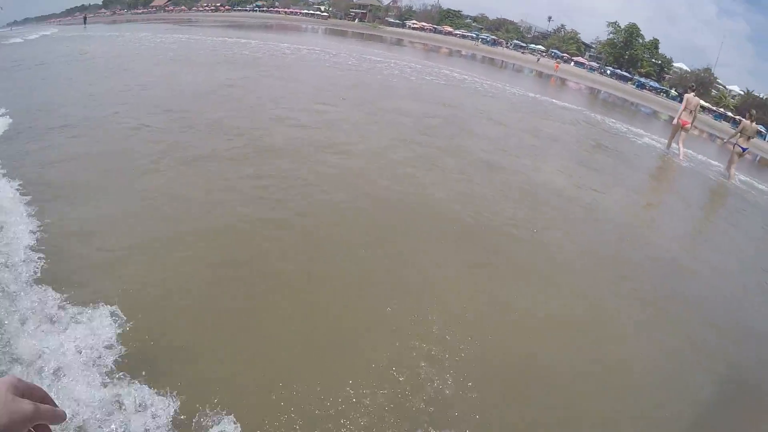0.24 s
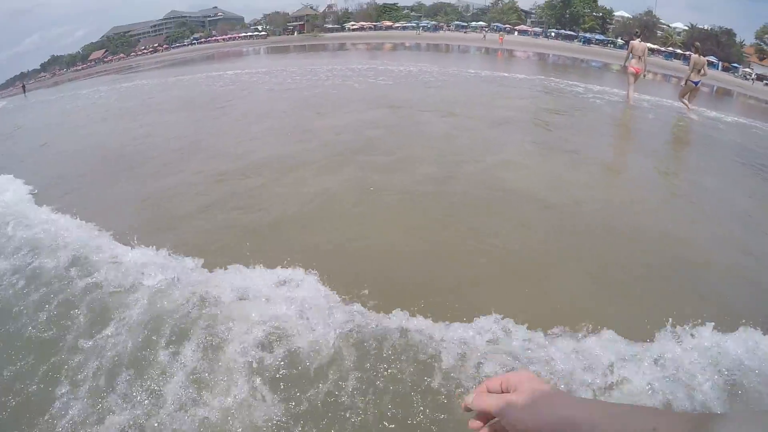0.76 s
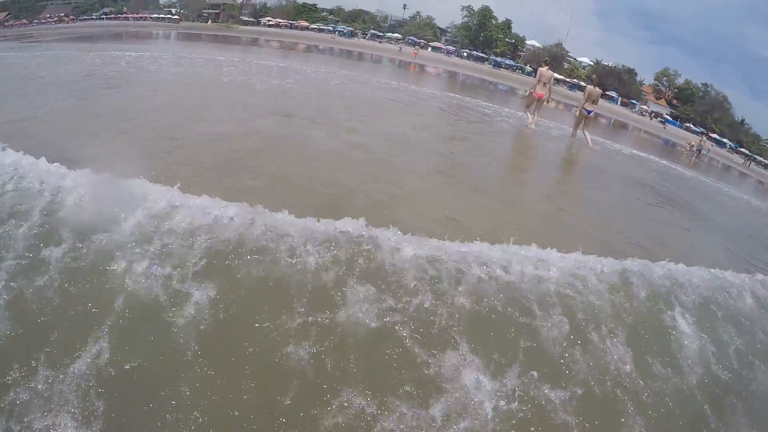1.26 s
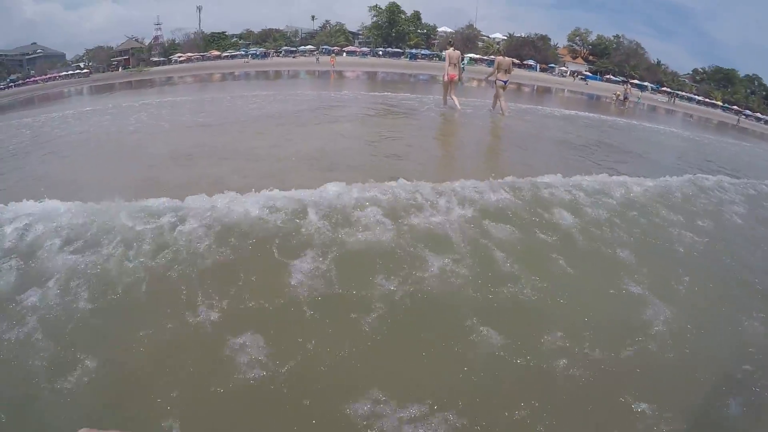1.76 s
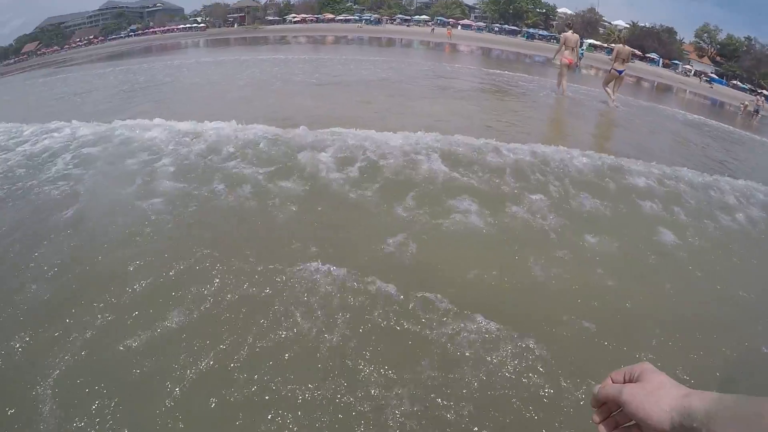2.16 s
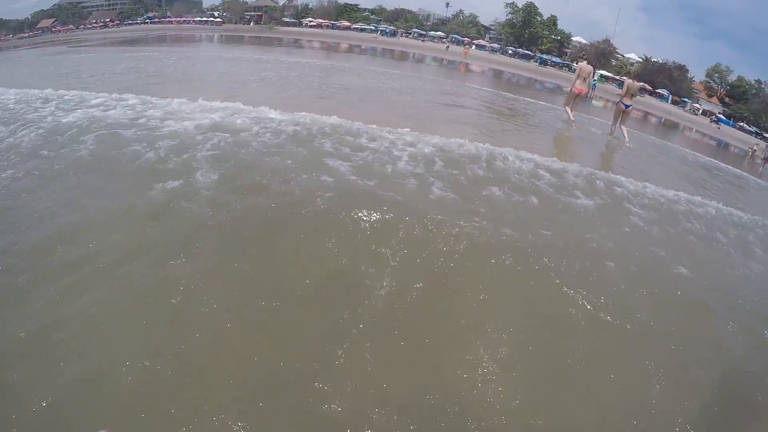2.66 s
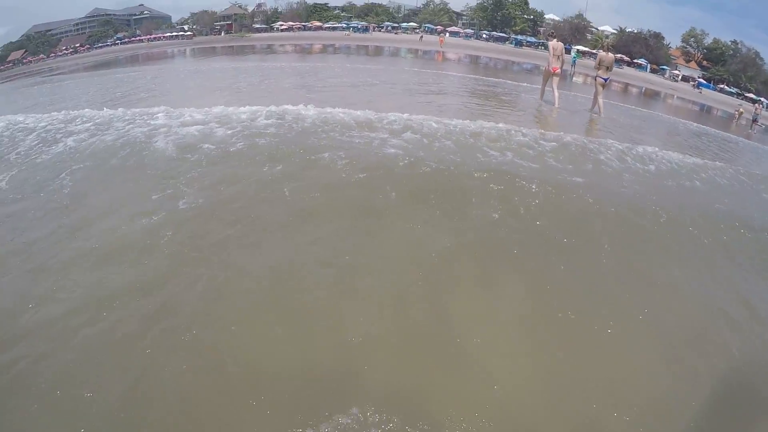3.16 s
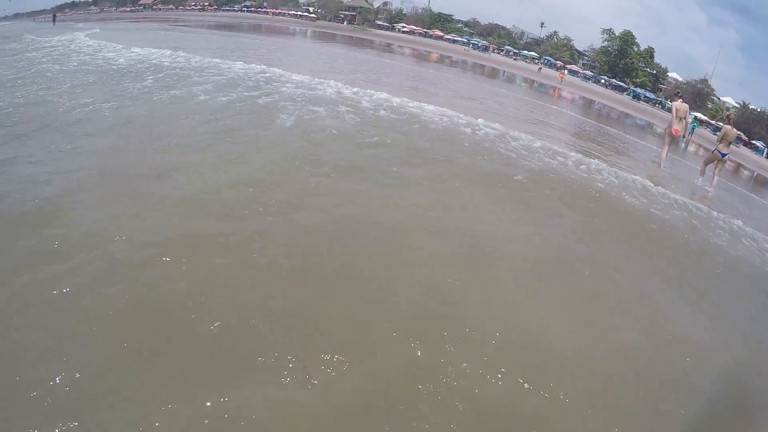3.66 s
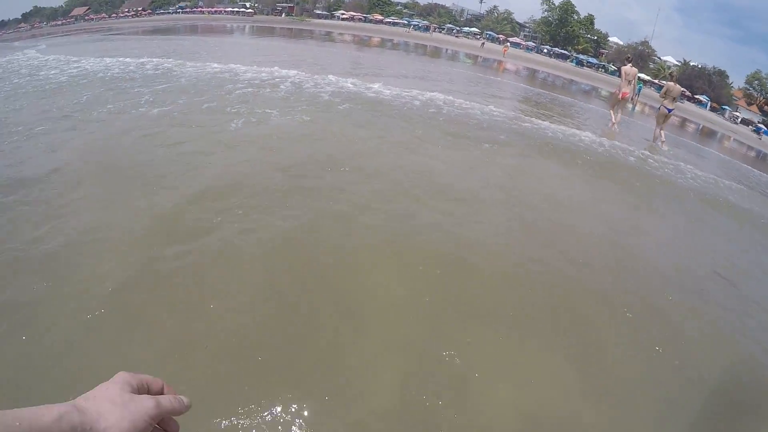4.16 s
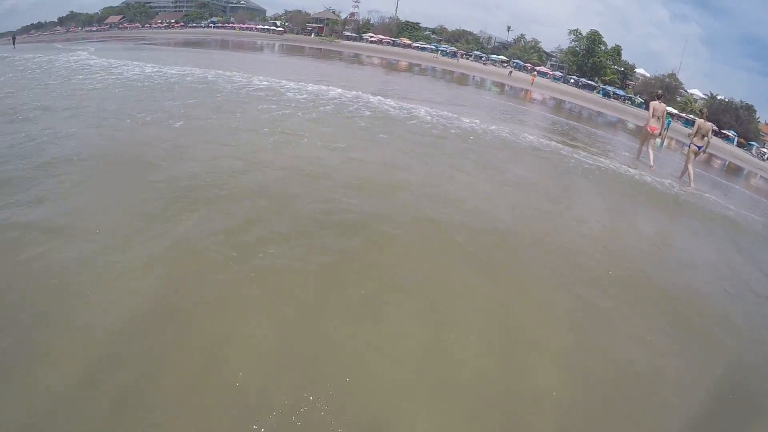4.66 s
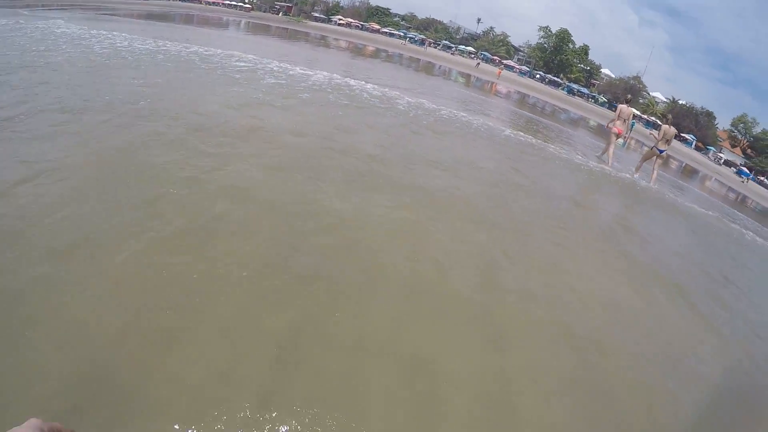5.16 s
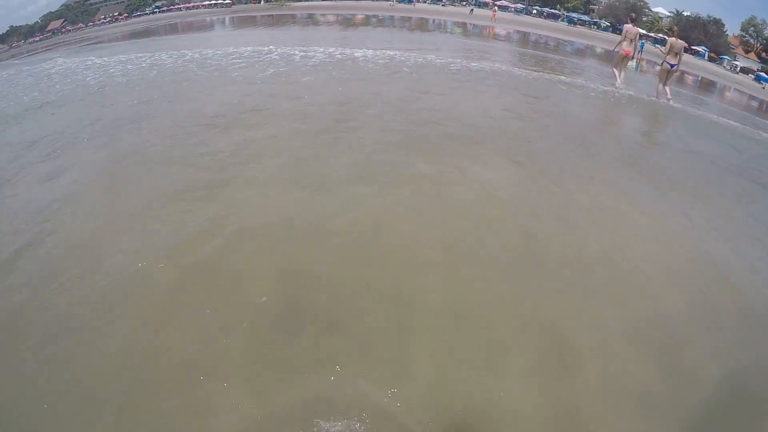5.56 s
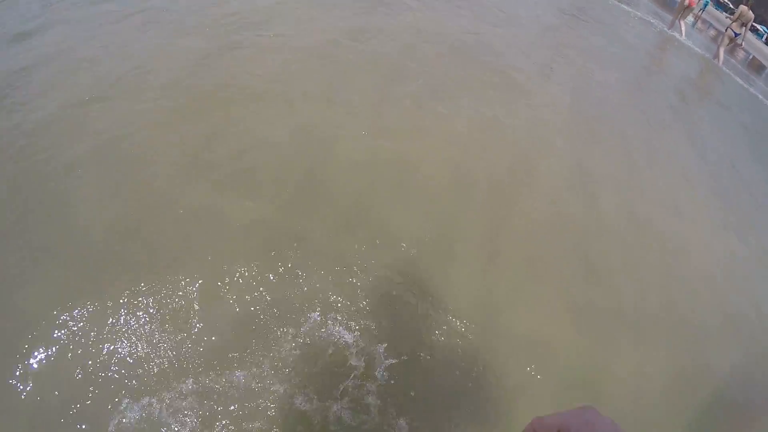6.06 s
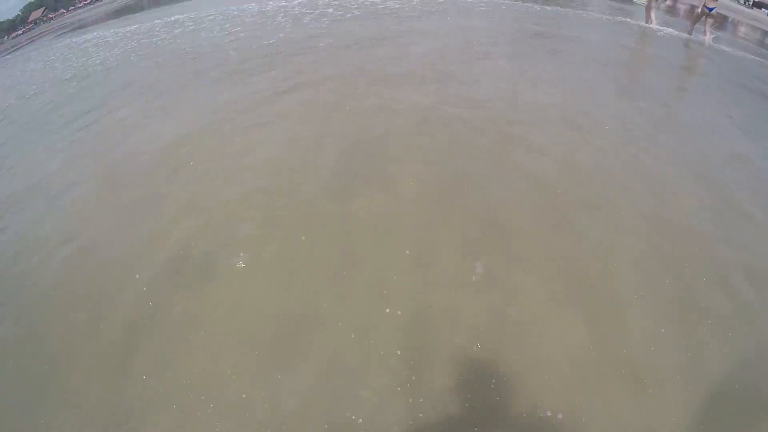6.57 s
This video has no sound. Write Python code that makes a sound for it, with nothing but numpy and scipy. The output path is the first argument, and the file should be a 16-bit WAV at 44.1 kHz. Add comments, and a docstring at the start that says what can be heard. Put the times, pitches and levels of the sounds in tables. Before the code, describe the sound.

Steady mid-toned surf rush with gurgling, fizzing bubbles, heard close and slightly boxy. An early splash and a breaking ripple come first, then uneven wading swishes, spray patter, small plops and occasional ticks of drops on the casing. Deep fluttering wind bumps recur with the strides. The last half second brings loud ragged buffeting and a burst of hard, dry water cracks.

```python
"""Wading through shallow surf and breaking into a run, heard from a body-worn camera in a waterproof case.
Over steady surf and a faint breeze a small wave slaps and foams past in the first second: noise and bubbles.
The legs churn up foam, spray and single plops; strides push wind over the case, as swelling turbulent noise.
Stray drops tick on the case, as short ringing noise bursts.
At the end the gusts crowd together and grow rough, and thrown water smacks the case with hard cracks."""
import sys
import numpy as np
from scipy import signal
from scipy.fft import rfft, irfft, next_fast_len
from scipy.io import wavfile
from scipy.ndimage import uniform_filter1d

SR = 44100
rng = np.random.default_rng(int(sys.argv[2]) if len(sys.argv) > 2 else 0)


def master(y):
    """Save y as 16-bit WAV."""
    cut = np.clip(np.atleast_2d(y).T, -1, 1)
    pcm = np.round(cut * 32767)  # scale
    wavfile.write(sys.argv[1], SR, pcm.astype(np.int16))


N = 300321
TIME = np.arange(N) / SR  # s

# A gust or two for each stride, crowding together in the run. Each row: centre in seconds,
# half length in seconds, then the levels in dB of its flutter, its slow swirl and its rough rush.
GUSTS = [(0.546, 0.057, -32, -15.5, -43.5), (1.196, 0.071, -36, -20, -47.5), (1.796, 0.031, -28, -19, -43),
         (1.861, 0.023, -18, -11.5, -48), (2.324, 0.039, -50, -23, -57), (2.434, 0.042, -42, -27, -50),
         (3.029, 0.038, -28, -25.5, -65), (3.688, 0.062, -33.5, -23, -45.5),
         (4.289, 0.026, -25.5, -21, -47), (4.356, 0.017, -34.5, -16.5, -60), (4.777, 0.06, -54, -25, -60),
         (5.451, 0.046, -37, -25.5, -54), (6.358, 0.093, -37, -19, -42), (6.467, 0.041, -22, -8.5, -31.5),
         (6.565, 0.028, -25, -18, -40), (6.677, 0.017, -14, -22, -38), (6.748, 0.036, -20, -8, -29.5)]


def undb(db):
    """Decibels to gain."""
    return 10 ** (np.asarray(db) / 20)


def unit(x):
    """Scale to rms 1."""
    return x / np.sqrt(np.mean(x ** 2))


def together(*strengths):
    """Joint strength of unrelated sounds: their powers add."""
    return np.sqrt(sum(strength ** 2 for strength in strengths))


def swells(times, halves, levels_db):
    """Strength over time of bell-shaped swells; a length or level may be shared by all."""
    rows = np.broadcast(times, halves, levels_db)
    power = sum(undb(db) ** 2 * np.exp(-((TIME - s) / half) ** 2) for s, half, db in rows)
    return np.sqrt(power)


def walk(rate):
    """Smooth random wander with spread near 1, taking rate new values a second."""
    steps = rng.standard_normal(4096)
    return 1.2 * np.interp(TIME * rate, np.arange(len(steps)), steps)


def add(out, s, sound):
    """Mix a short sound in at time s."""
    i = int(np.clip(s * SR, 0, N - 1))
    out[i:i + len(sound)] += sound[:N - i]


def colour(x, points):
    """Causal filter with the given (Hz, dB) outline, falling away steeply above its last point."""
    size = next_fast_len(N + SR // 2) * 2
    hz, db = np.transpose(points)
    freq = np.arange(size // 2 + 1) * SR / size + 1  # 1 Hz up, so the logarithm exists
    outline_db = np.interp(np.log(freq), np.log(hz), db)
    outline_db = outline_db - 20 * np.maximum(np.log2(freq / hz[-1]), 0)
    # folding the cepstrum onto positive times gives minimum phase
    cepstrum = irfft(np.log(undb(outline_db)))
    cepstrum[1:size // 2] *= 2
    cepstrum[size // 2 + 1:] = 0
    response = np.exp(rfft(cepstrum))
    return irfft(rfft(x, size) * response)[:N]


def split(x, hz, side):
    """The low or the high side of a sound."""
    return signal.sosfilt(signal.butter(3, hz, side, fs=SR, output="sos"), x)


def resonate(x, hz, width):
    """One resonance, gain 1 at its centre."""
    b, a = signal.iirpeak(hz, hz / min(width, SR / 4), fs=SR)
    return signal.lfilter(b, a, x)


def ring(x, resonances):
    """Lift or dip the sound at each (Hz, width, dB) resonance."""
    return x + sum((undb(db) - 1) * resonate(x, hz, width) for hz, width, db in resonances)


def bubble(hz, cycles, glide):
    """A trapped pocket of air rings out, rising in pitch as it nears the surface."""
    age = np.arange(int(cycles * SR / hz) + 2) * hz / (cycles * SR)  # 0 to 1 over the ring
    tone = np.sin(2 * np.pi * cycles * age * (1 + glide * age / 2))
    return tone * np.exp(-np.log(100) * age)


def bubbles(lo_hz, hi_hz, cycles, glide, spread_db, count):
    """A cloud of bubbles at random times and pitches: many faint ones, a few strong."""
    out = np.zeros(N)
    for when, pitch, size, ringing in rng.random((count, 4)):
        strength = undb(spread_db * min(-np.log(1 - size), 5))
        hz = lo_hz * (hi_hz / lo_hz) ** pitch
        add(out, when * N / SR, strength * bubble(hz, cycles * (.5 + ringing), glide))
    return unit(out)


def patter(rate, spread_db):
    """Random tiny impacts of uneven size, about rate of them a second."""
    sizes = undb(spread_db * np.minimum(rng.exponential(size=N), 4.5))
    hits = rng.random(N) < rate / SR
    return unit(hits * sizes * rng.choice([-1, 1], N))


def eddies(points, hold_s):
    """Turbulent pressure whose strength stays even over about hold_s."""
    x = unit(colour(rng.standard_normal(N), points))
    power = np.abs(signal.hilbert(x, next_fast_len(N))[:N]) ** 2 / 2
    hold = int(hold_s * SR)
    power = uniform_filter1d(uniform_filter1d(power, hold), hold)
    return x / np.sqrt(power + .03)  # the floor keeps lulls from being blown up


def water_levels():
    """Churning, foam and spray in dB: the open sea, one wave passing in its wide patch of foam, and splashes."""
    # The water's three voices, before the trims in wash() and scene().
    # Each: churning level in dB, foam level in dB, fine spray level in dB.
    open_sea_db = (-52, -49.5, -61.5)
    wave_crest_db = (-48, -43, -47.5)
    wave_foam_db = (-56, -45, -56)
    # Splashes of the legs, and at 0.533 s the slap of a small wave, before the same trims.
    # Each row: centre in seconds, half length in seconds, foam level in dB, fine spray level in dB.
    splashes = [(0.024, 0.11, -45.5, -46), (0.533, 0.034, -44, -48), (1.256, 0.13, -55, -52),
                (1.76, 0.19, -51, -53.5), (2.082, 0.063, -55, -56), (2.98, 0.078, -49.5, -59),
                (4.178, 0.13, -53, -58), (4.312, 0.047, -52.5, -57.5), (4.836, 0.12, -45.5, -54),
                (5.465, 0.1, -50.5, -60.5), (6.04, .1, -56, -54.5), (6.484, 0.018, -44.5, -56),
                (6.703, 0.13, -60, -54.5)]
    wave_passes_s, crest_half_s, foam_half_s = 0.54, 0.27, 1.39
    splash_churn_db = -7.5  # churning relative to the foam of a splash

    s, half, foam_db, spray_db = np.transpose(splashes)
    splashing = [swells(s, half, db) for db in (foam_db + splash_churn_db, foam_db, spray_db)]
    crest = [swells(wave_passes_s, crest_half_s, db) for db in wave_crest_db]
    patch = [swells(wave_passes_s, foam_half_s, db) for db in wave_foam_db]
    voices = zip(undb(open_sea_db), crest, patch, splashing)
    return [20 * np.log10(together(*parts)) for parts in voices]


def wash(churn_db, foam_db):
    """Broken water: big bubbles gurgle and small ones burst in the foam, over the rushing noise of the surf."""
    # Colour of the surf. Each row: frequency in Hz, filter gain in dB.
    surf_colour = [(150, 0.5), (300, -1), (520, -6), (900, -2), (1180, -3.5), (1450, 2.5), (2200, -0.5),
                   (2900, -5.5), (3150, -10), (4200, -9), (5500, -19), (8200, -27.5), (9500, -32),
                   (15000, -35)]
    gurgle = bubbles(lo_hz=410, hi_hz=1284, cycles=15.0, glide=0.28, spread_db=2.5, count=1400)
    fizz = bubbles(lo_hz=1242, hi_hz=6060, cycles=13.0, glide=0.06, spread_db=2.5, count=7000)

    rush = colour(rng.standard_normal(N), surf_colour)
    churn = unit(split(rush, 1080, "low")) + undb(-8.5) * gurgle

    bursting = rng.standard_normal(N) + 0.89 * patter(rate=2500, spread_db=3.0)
    foam = unit(split(colour(bursting, surf_colour), 990, "high"))
    foam = foam + undb(-4) * unit(colour(fizz, surf_colour))

    # both levels waver a little
    churn = unit(churn) * undb(churn_db + 3.0 + 0.59 * walk(16))
    return churn + unit(foam) * undb(foam_db + 0.47 * walk(25))


def spray(spray_db):
    """Flung drops patter back on the sea in little showers, among the tinkle of tiny bubbles."""
    # Colour of the fine spray. Each row: frequency in Hz, filter gain in dB.
    spray_colour = [(2000, -8.5), (3200, 5.5), (4200, -1), (5500, -1), (7200, -6), (8300, -8.5),
                    (9200, -11.5), (12000, -15), (15000, -16)]
    drops = patter(rate=900, spread_db=3.0) + undb(1) * rng.standard_normal(N)
    tinkle = bubbles(lo_hz=3090, hi_hz=14400, cycles=11, glide=0.14, spread_db=3.5, count=2600)
    shower = unit(colour(drops, spray_colour)) + undb(-4) * unit(colour(tinkle, spray_colour))
    return unit(shower) * undb(spray_db + 1.5 * walk(22.14))


def wind():
    """Each stride swings the case through the air: slow swirls, and a flutter that booms in its cavity."""
    # Soft puffs as the body swings between strides. Each row: centre in seconds, level in dB.
    swings = [(.05, -33.5), (.3, -33.5), (.85, -29), (1.64, -29.5), (2.02, -27.5), (2.82, -30),
              (3.23, -24.5), (4.0, -29.5), (4.48, -28.5), (4.92, -31), (5.152, -27), (5.61, -27.5),
              (5.93, -27), (6.2, -34.5)]
    # Colours of the slow swirl and of the booming flutter. Each row: frequency in Hz, filter gain in dB.
    swirl_colour = [(8, -1), (15, 0), (23, 14), (36, -6), (62, -9.5), (100, -21.5), (200, -46)]
    flutter_colour = [(40, -14.5), (62, 2), (86, -6.5), (108, 1.5), (130, -0.5), (160, -14.5), (200, -25.5),
                      (300, -30.5), (900, -41), (2000, -59)]
    breeze_swirl_db, breeze_flutter_db = -45, -55
    swing_half_s, swing_flutter_db = 0.049, -21.5  # flutter relative to the puff
    swirl_lag_s = 0.029  # the slow swirl trails its gust

    s, half, flutter_db, swirl_db, _ = np.transpose(GUSTS)
    swing_s, swing_db = np.transpose(swings)
    puffs = swells(swing_s, swing_half_s, swing_db)
    gust_swirl = swells(s + swirl_lag_s, half, swirl_db)
    swirl = together(gust_swirl, puffs, undb(breeze_swirl_db))
    gust_flutter = swells(s, half, flutter_db)
    flutter = together(gust_flutter, undb(swing_flutter_db) * puffs, undb(breeze_flutter_db))
    # the flutter comes in lumps as single eddies pass
    lumps = unit(undb(2.4 * walk(55)))
    slow = swirl * eddies(swirl_colour, hold_s=0.083)
    return slow + flutter * lumps * eddies(flutter_colour, hold_s=0.06)


def hiss():
    """The faint even hiss of the microphone."""
    return undb(-70.5) * rng.standard_normal(N)


def crack(db, hz, width, t60):
    """A brief impact that rings one resonance of the case; db is its peak."""
    age = TIME[:SR // 10]
    contact = rng.standard_normal(len(age)) * np.exp(-np.log(1000) * age / t60)
    contact[0] += 6  # an extra kick at first touch
    knock = split(resonate(contact, hz, width), min(2 * hz, SR / 3), "low")
    return undb(db) * knock / np.abs(knock).max()


def smacks():
    """Stray drops tick on the case; thrown water hits it with short hard cracks."""
    # Single drops on the case. Each row: start in seconds, peak level in dB, centre in Hz.
    drops = [(0.0581, -25.5, 4940), (.622, -37, 4460), (1.019, -47, 8000), (1.257, -45, 7000),
             (2.076, -49, 11000), (4.253, -34, 5500), (4.314, -38.5, 5970), (4.9077, -33, 4500),
             (6.6905, -49, 5500)]
    # Thrown water striking the case. Each row: start in seconds, peak level in dB, centre in Hz,
    # width in Hz, 60 dB decay time of the contact noise in seconds.
    strikes = [(6.474, -31, 1910, 1400, 0.087), (6.492, -25.5, 1010, 400, 0.039),
               (6.7392, -11.5, 1400, 905, 0.0084), (6.7385, -21, 4000, 4000, 0.008),
               (6.7443, -24, 4000, 900, 0.0021), (6.7576, -15, 4170, 2600, 0.0096),
               (6.7574, -12, 2860, 340, 0.02), (6.77, -20.5, 2570, 900, 0.012)]
    out = np.zeros(N)
    for s, db, hz in drops:
        add(out, s, crack(db, hz, width=1800, t60=0.025))
    for s, db, hz, width, t60 in strikes:
        add(out, s, crack(db, hz, width, t60))
    return out


def gusts():
    """At its crest a hard gust breaks up into a ragged, sputtering rush that rings the panels of the case."""
    # Colour of the torn air. Each row: frequency in Hz, filter gain in dB.
    torn_colour = [(120, 2), (200, 6), (260, 2.5), (330, 0), (500, -2.5), (800, -2.5), (1250, -14.5),
                   (1900, -5.5), (3000, -22.5), (4200, -20), (7000, -41), (15000, -43)]
    # Low resonances of the case's panels. Each row: centre in Hz, width in Hz, boost in dB.
    panels = [(246, 22, 7), (417, 39, 0.5), (526, 38, 7), (1006, 135, 8.5)]
    s, half, _, _, rush_db = np.transpose(GUSTS)
    sputter = rng.standard_normal(N) + 0.31 * patter(rate=900, spread_db=3)
    turbulence = unit(ring(colour(sputter, torn_colour), panels))
    ragged = undb(3.5 * walk(110))
    return swells(s, 0.77 * half, rush_db) * turbulence * ragged  # the rush is shorter than its gust


def plops():
    """Single large bubbles close to the legs, each a decaying tone that rises in pitch."""
    # Bubbles that stand out of the wash. Each row: start in seconds, starting pitch in Hz, level in dB.
    large_bubbles = [(0.743, 1090, -32.5), (.765, 2280, -30), (1.283, 4070, -38), (1.364, 3450, -36),
                     (1.58, 2820, -34.5), (1.757, 1470, -34), (1.876, 725, -31), (2.629, 1770, -36.5),
                     (2.967, 1250, -34), (3.372, 1020, -34), (3.598, 900, -33), (3.862, 1300, -34),
                     (4.322, 1740, -28), (4.333, 2210, -34.5), (5.901, 1380, -29.5), (6.124, 1480, -31.5),
                     (6.644, 1470, -33)]
    ring_s = 0.014  # time to fall by 40 dB
    out = np.zeros(N)
    for s, hz, db in large_bubbles:
        add(out, s, undb(db) * bubble(hz, hz * ring_s, glide=0.21))
    return out


def scene():
    """Wash and spray are heard through the ringing case; plops, wind and smacks are added directly."""
    # Resonances of the case and the notches between them.
    # Each row: centre in Hz, width in Hz, boost in dB (negative for a notch).
    case = [(686, 33, 2.5), (1830, 127, 3), (2270, 74, 0.5), (2740, 235, 5.5), (3020, 150, -4),
            (4760, 160, -4), (6870, 210, 3), (8100, 110, 2.5)]
    churn_db, foam_db, spray_db = water_levels()
    sea = ring(wash(churn_db, foam_db) + spray(spray_db), case)
    mix = undb(-1.29) * sea + plops() + smacks() + wind() + gusts() + hiss()
    return mix[None]  # one channel


def record(dry):
    """The camera cuts the top, with a steep low-pass at 15.25 kHz."""
    return signal.sosfilt(signal.ellip(10, .2, 80, 15250, fs=SR, output="sos"), dry)


dry = scene()
out = record(dry)
master(out)
```